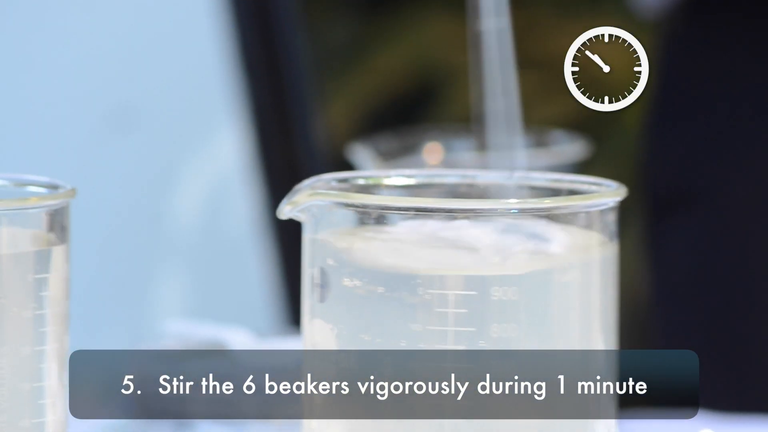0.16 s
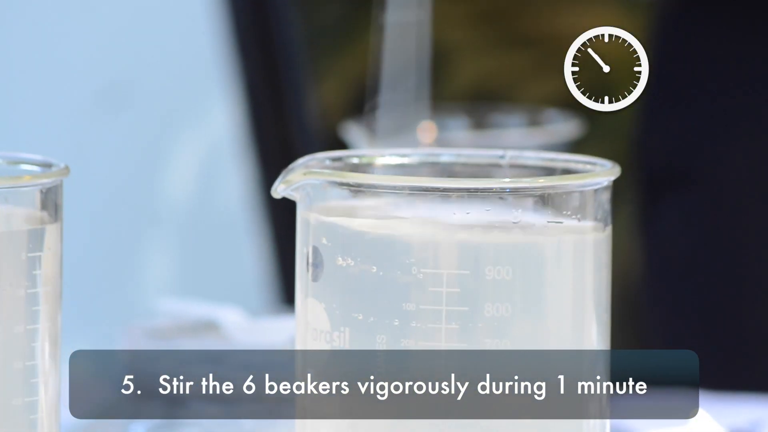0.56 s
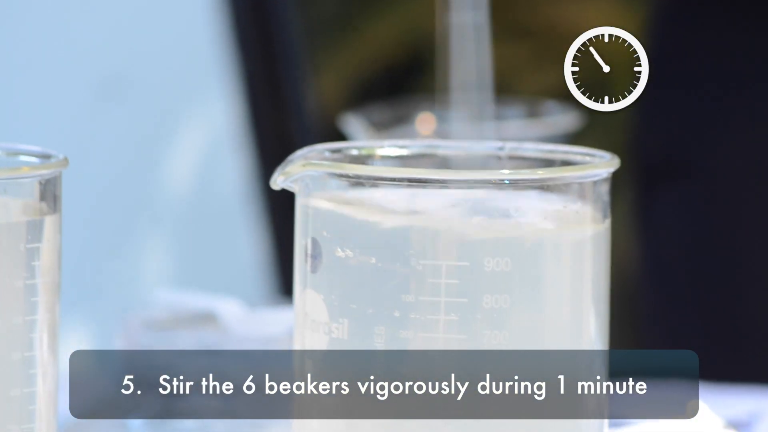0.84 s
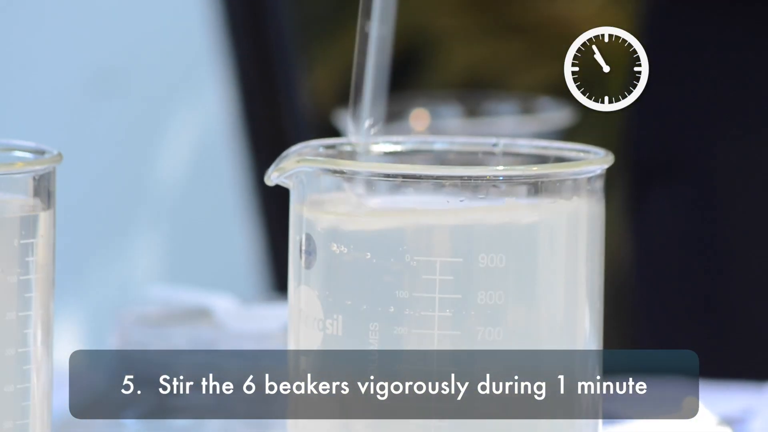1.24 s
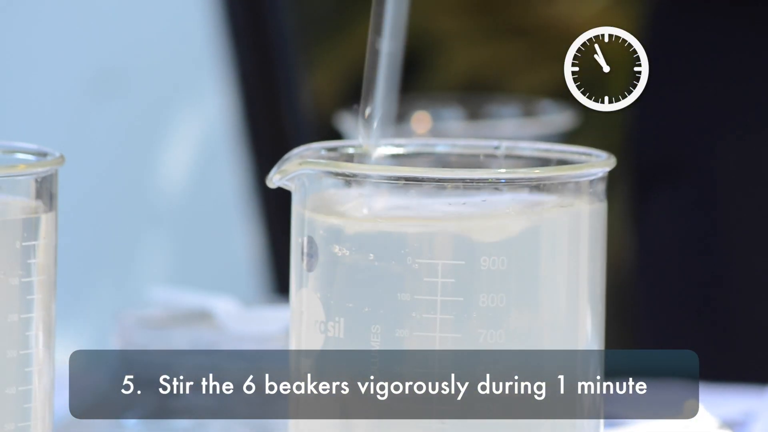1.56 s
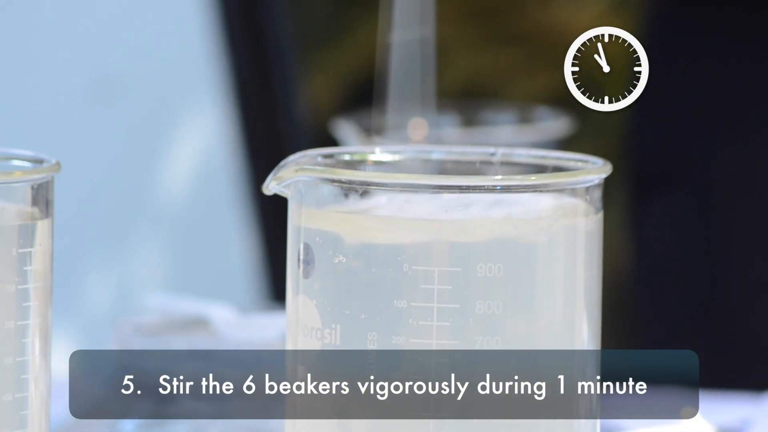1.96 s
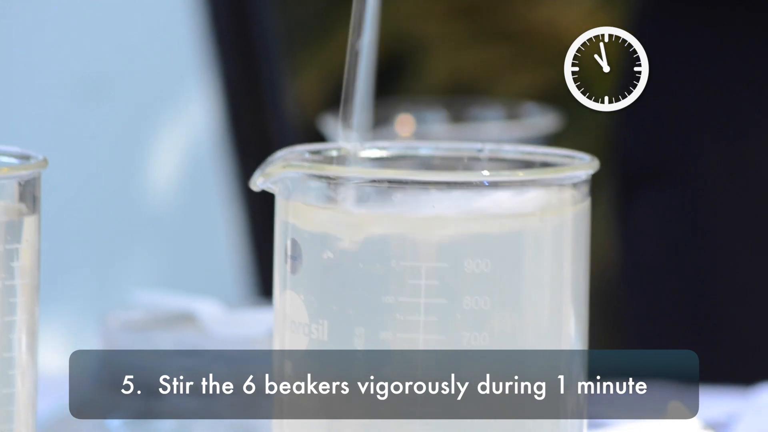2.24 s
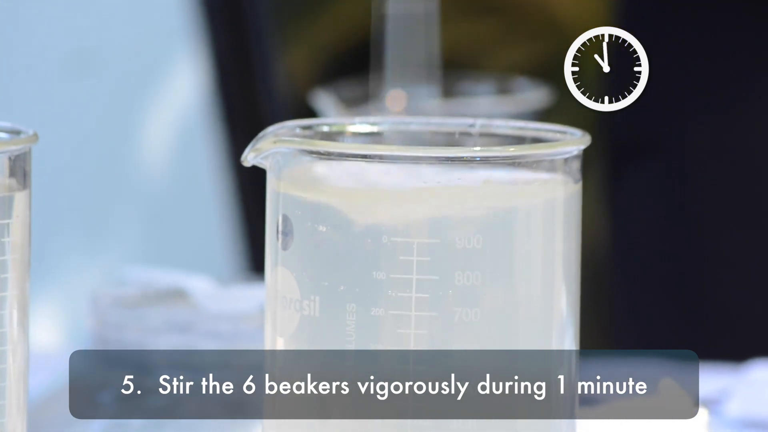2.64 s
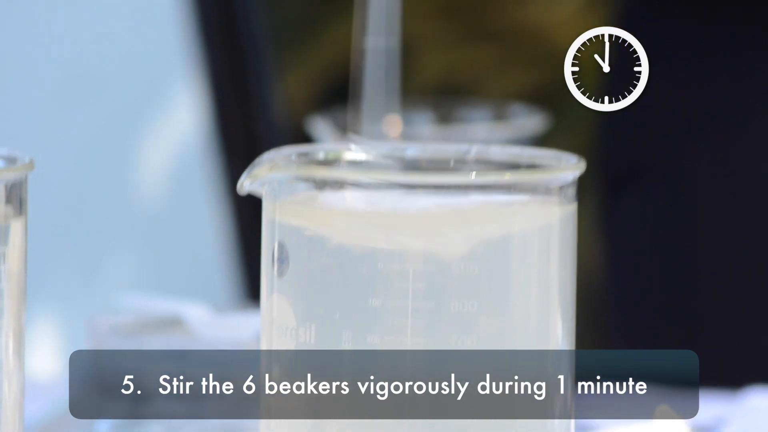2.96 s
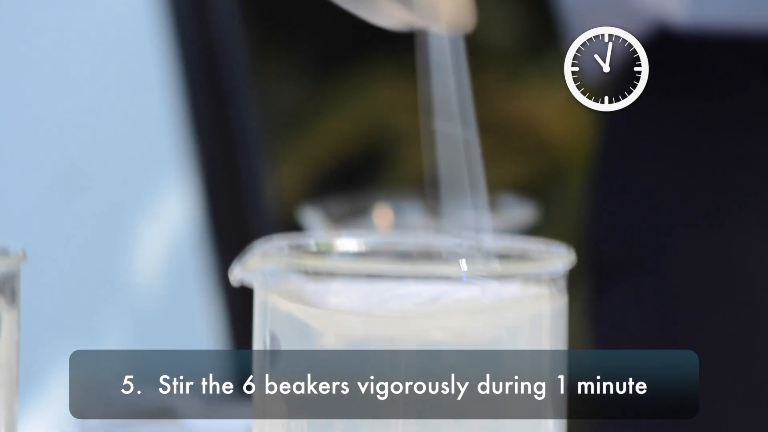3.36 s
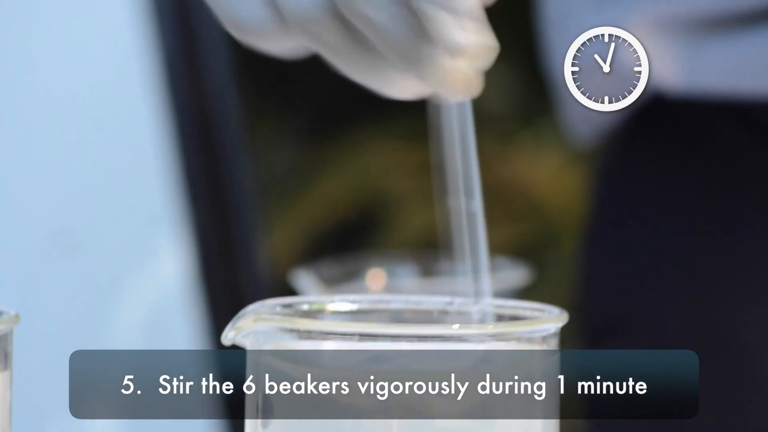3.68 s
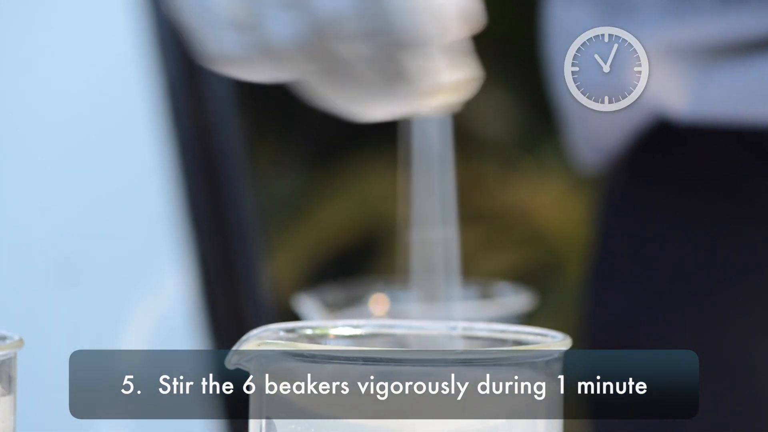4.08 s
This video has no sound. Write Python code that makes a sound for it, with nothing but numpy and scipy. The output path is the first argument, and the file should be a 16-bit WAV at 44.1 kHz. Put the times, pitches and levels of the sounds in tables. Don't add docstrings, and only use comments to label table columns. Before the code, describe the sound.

Close to the microphone, a thin glass rod knocks and bounces on the wall of a full beaker, in bright, short, wet clinks. The strokes come unevenly, with a gap early on and denser clusters after three seconds. Water hisses faintly. Behind, a songbird whistles gliding phrases softened by yard echoes, over outdoor air, distant machine hum and small puffs of wind.

```python
import sys
import numpy as np
from scipy import signal
from scipy.io import wavfile
from scipy.ndimage import uniform_filter1d

SR = 44100
rng = np.random.default_rng(int(sys.argv[2]) if len(sys.argv) > 2 else 0)


def volts_from_decibels(level):
    exponent = np.asarray(level, float) / 20
    return 10 ** exponent


def transcribe(u):
    v = np.clip(np.atleast_2d(u).T, -1, 1)
    q = np.round(v * 32767).astype(np.int16)
    wavfile.write(sys.argv[1], SR, q)


N = 185793

# t/s, level/dB, then low wall ring/dB, middle wall ring/dB, rod brightness/dB,
# all three relative to the blow
FIRST_BLOWS = [(0.0004, -10, -24, -20, -25), (0.1532, -14.5, -17, -11, -16.5), (0.323, -21, -39, -23, -23),
               (0.966, -19, -14, -14.5, -15), (1.134, -16, -8, -9.5, -13), (1.2881, -23.5, -13.5, -13, -23),
               (1.4654, -8.5, -12, -13.5, -22.5), (1.6139, -10, -27, -20.5, -12.5),
               (1.949, -9.5, -13, -12.5, -17), (2.274, -20, -48, -8.5, -17), (2.586, -21.5, -14, -8, -20),
               (2.9376, -10.5, -14.5, -4, -9), (3.265, -9, -5, -10, -10.5),
               (3.5882, -11.5, -11, -8.5, -12.5), (3.9414, -9.5, -15, -7, -14),
               (4.0956, -14.5, -16, -16, -19)]
# t/s, level/dB, middle wall ring/dB and rod brightness/dB relative to the blow
REBOUNDS = [(0.028, -18.5, -34, -15), (0.173, -16.5, -27, -21), (0.358, -21.5, -22, -15.5),
            (0.755, -54, -6, -30), (0.985, -25.5, -4.5, -19), (1.1569, -15, -17, -26),
            (1.2973, -36, -17, -22), (1.4142, -48.5, 12.5, -22), (1.4855, -20, -9.5, -15.5),
            (1.64, -13, -24, -20), (1.7604, -36, -2.5, -18), (1.9768, -17.5, -9.5, -15),
            (1.995, -27, -23, -18), (2.055, -39.5, -1, -17), (2.985, -12, -15.5, -16.5),
            (3.0207, -14.5, -11, -21), (3.047, -23, -25, -12), (3.256, -48, 0, -8),
            (3.3162, -11.5, -13.5, -14), (3.3502, -16.5, -16, -23), (3.385, -18, -12.5, -11),
            (3.6202, -13.5, -20, -15.5), (3.6446, -26, -23, -24), (3.72, -44.5, 11, -20),
            (3.9856, -17.5, -14, -12.5)]
# t/s, level/dB
DRAG = [(0.0, -60), (0.13, -53.5), (0.6, -64.5), (.95, -64), (1.25, -54.5), (1.4, -64), (1.61, -46),
        (1.75, -54), (2.32, -56.5), (2.41, -70), (2.8, -72), (3.04, -50.5), (3.16, -50), (3.22, -56),
        (3.33, -55), (3.44, -61), (3.55, -56), (3.65, -55), (3.78, -62), (4.21, -62)]


def evened(x):
    return x / np.sqrt(np.mean(x ** 2) + 1e-20)


def read(points, hz):
    f, value = np.transpose(points)
    return np.interp(np.log(hz + 1), np.log(f + 1), value)


def curve(rows):
    s, level = np.transpose(rows)
    return np.interp(np.arange(N) / SR, s, level)


def add(mix, s, sound):
    part = mix[max(round(s * SR), 0):][:len(sound)]
    part += sound[:len(part)]


def soft_rise(t, rise_s):
    return np.sin(np.pi / 2 * np.clip(t / rise_s, 0, 1)) ** 2


def bandpass(x, order, low_hz, high_hz):
    return signal.sosfilt(signal.butter(order, (low_hz, high_hz), "bandpass", fs=SR, output="sos"), x)


def spread_wide(mid, side):
    return mid + side * np.array([[1], [-1]])


def narrow(hz, width):
    r = np.exp(-np.pi * width / SR)
    z = rng.standard_normal(N) + 1j * rng.standard_normal(N)
    for _ in range(2):
        z = signal.lfilter([1 - r], [1, -r], z)
    turns = np.cumsum(hz * np.ones(N)) / SR
    return evened((z * np.exp(2j * np.pi * turns)).real)


def echoes(x, t60_low, t60_high, gap_s):
    t = np.arange(SR) / SR
    noise = rng.standard_normal((2, SR)) * np.clip(t / gap_s, 0, 1)
    low = signal.lfilter(*signal.butter(2, 5000, fs=SR), noise)
    tail = low * volts_from_decibels(-60 * t / t60_low) + (noise - low) * volts_from_decibels(-60 * t / t60_high)
    return signal.fftconvolve(x[None], tail / np.linalg.norm(tail[0]), axes=1)[:, :N]


def favoured(s):
    # t/s, f/Hz, level/dB
    by_strikes = [(0.1536, 2693, -35), (0.1536, 5140, -38), (0.1536, 8730, -36.0), (0.1536, 13900, -28),
                  (0.3228, 3400, -43), (0.3228, 4200, -43), (0.3228, 6300, -39), (0.3228, 13350, -53),
                  (0.966, 2730, -40), (0.966, 5600, -44), (0.966, 8370, -30.5), (0.966, 13600, -31),
                  (1.134, 2710, -31), (1.134, 4730, -28.5), (1.134, 7700, -27.5), (1.134, 10820, -27),
                  (1.2884, 3090, -35), (1.2884, 4810, -46), (1.2884, 8500, -41), (1.2884, 13500, -47),
                  (1.4649, 2710, -32), (1.4649, 4680, -34), (1.4649, 6270, -25.5), (1.4649, 13500, -31),
                  (1.6148, 3057, -22.5), (1.6148, 4680, -29), (1.6148, 6730, -28.5), (1.6148, 14360, -25),
                  (1.9487, 2900, -26), (1.9487, 4870, -26.5), (1.9487, 8480, -26), (1.9487, 14000, -26),
                  (2.274, 2850, -53), (2.274, 4830, -35.5), (2.274, 8290, -32.5), (2.274, 13100, -47),
                  (2.586, 3500, -34), (2.586, 4920, -36), (2.586, 8260, -38), (2.586, 13100, -43.0),
                  (2.9376, 2880, -30), (2.9376, 4630, -30.5), (2.9376, 6330, -28), (2.9376, 13710, -21),
                  (3.265, 2810, -20.5), (3.265, 4674, -27), (3.265, 7770, -27), (3.265, 14000, -19),
                  (3.5888, 3000, -26.5), (3.5888, 4910, -31.5), (3.5888, 7400, -34), (3.5888, 10800, -28.5),
                  (3.9418, 3150, -22.5), (3.9418, 4450, -41), (3.9418, 6100, -35), (3.9418, 13600, -18.5),
                  (4.0956, 2960, -37), (4.0956, 4656, -33.5), (4.0956, 7760, -28), (4.0956, 13300, -27),
                  (0.0277, 2240, -42.5), (0.0277, 6320, -41), (0.0277, 8310, -48), (0.1724, 3930, -40),
                   (0.1724, 4510, -45), (0.1724, 12770, -36), (0.3566, 3060, -43), (0.3566, 6420, -34.5),
                   (0.3566, 8520, -40), (0.9851, 2760, -36), (0.9851, 6570, -35.5), (0.9851, 8660, -35),
                   (1.1564, 3080, -29), (1.1564, 6280, -37), (1.1564, 10690, -33), (1.4855, 1930, -45),
                   (1.4855, 4610, -49), (1.4855, 13390, -31), (1.6399, 2870, -31), (1.6399, 4670, -32.5),
                   (1.6399, 13540, -30), (1.7604, 2220, -51), (1.7604, 4530, -49.5), (1.7604, 8560, -49),
                   (1.9773, 2840, -32), (1.9773, 4650, -40.5), (1.9773, 12310, -32), (2.986, 3010, -28),
                   (2.986, 4690, -34), (2.986, 7880, -23), (3.0209, 3000, -26), (3.0209, 4660, -38.5),
                   (3.0209, 8540, -30.5), (3.045, 2660, -42), (3.045, 4650, -47), (3.045, 8550, -42),
                   (3.3158, 2140, -32), (3.3158, 6300, -31), (3.3158, 7840, -24.5), (3.352, 1910, -39),
                   (3.352, 4630, -30.5), (3.352, 10790, -32.5), (3.3852, 2830, -37.5), (3.3852, 6330, -37),
                   (3.3852, 8520, -31), (3.6204, 3070, -30), (3.6204, 4670, -37), (3.6204, 13410, -28),
                   (3.9857, 2790, -26), (3.9857, 4690, -43), (3.9857, 7700, -30.5)]
    rows = [row[1:] for row in by_strikes if abs(row[0] - s) < .005]
    return np.array(rows).reshape(-1, 2)


def knock(low_db, middle_db, bright_db, singled, blow_db, rise_s):
    # f/Hz, level/dB, t60/s
    base = [(1298, -14, .12), (1600, -9, .04), (1885, 1, .09), (2050, -7, .05), (2170, -9, .04)]
    # f/Hz, level/dB, t60/s
    wall = [(2300, -14, .04), (2488, -12, .13), (2640, -11, .04), (2780, 3, .13), (2900, -10, .04),
            (3060, -3, .04), (3300, -9, .03)]
    # f/Hz, level/dB, t60/s
    upper = [(3742, -11, .08), (4150, -10, .02), (4520, -5, .035), (4645, 1, .11), (4790, -3, .03),
             (4950, -8, .02)]
    # f/Hz, level/dB, t60/s
    rod_low = [(5420, -8, .025), (5900, -9, .02), (6290, -1, .025), (6950, -5, .025), (7500, -6, .02),
               (7830, 2, .03), (8300, -5, .02), (8700, -5, .02), (9030, -8, .06), (9400, -8, .02)]
    # f/Hz, level/dB, t60/s
    rod_high = [(10300, -3, .02), (11000, -5, .02), (11720, -9, .04), (12270, -2, .025), (12600, -6, .02),
                (13390, -4, .025), (13740, 0, .025), (14300, -8, .02), (15200, -10, .02)]
    # f/Hz, t60/s
    favoured_t60 = [(2000, .05), (2800, .055), (3300, .03), (4680, .08), (6300, .04), (8000, .035),
                    (13500, .018)]

    t = np.arange(6000) / SR
    contact_s = rise_s + 0.004
    contact = 1 / (1 + (t / contact_s) ** 4.5)
    rise = soft_rise(t, rise_s)
    out = np.zeros(len(t))
    out[:600] = volts_from_decibels(-5.5) * (rise * contact)[:600] * rng.standard_normal(600)

    upper_db = (middle_db + bright_db) / 2 - 4.5
    # modes, level dB, share that rings on after contact, detuning
    families = ((base, low_db + 3.5, .55, .002), (wall, middle_db + 4.5, .5, .002),
                (upper, upper_db + 7.5, .3, .002),
                (rod_low, -5.0, .22, .009), (rod_high, bright_db + 10.5, .18, .009))
    for modes, db, rings_on, detune in families:
        hz, mode_db, t60 = np.transpose(modes)[:, :, None]
        uneven, phase = rng.standard_normal((2, len(hz), 1))
        decay_db = -60 * np.maximum(t - 0.45 * contact_s, 0) / t60
        taken = (abs(hz / (singled[:, 0] + 1) - 1) < .035).any(1, keepdims=True)
        tones = np.sin(2 * np.pi * hz * (1 + detune * phase) * t + 10 * phase)
        body = ~taken * volts_from_decibels(mode_db + 2.2 * uneven + decay_db) * tones
        rung = body.sum(0) * rise * (rings_on + (1 - rings_on) * contact)
        out += volts_from_decibels(db) * rung / np.sqrt(np.mean(rung[:300] ** 2))

    for hz, db in singled:
        rings_on = .35 if hz < 5200 else .15
        decay_db = -60 * np.maximum(t - 0.5 * contact_s, 0) / read(favoured_t60, hz)
        tone = volts_from_decibels(db + 4 - blow_db + decay_db) * np.sin(2 * np.pi * hz * t)
        out += tone * rise * (rings_on + (1 - rings_on) * contact)

    late = round(.0056 * SR)
    return out + volts_from_decibels(-12.5) * np.pad(out, (late, 0))[:len(out)]


def bubbles():
    # t/s, level/dB, f/Hz, t60/s
    pops = [(0, -15, 983, 0.024), (0, -20.5, 1270, 0.037), (0.433, -30.5, 1300, 0.032),
            (.615, -39, 926, 0.049), (0.824, -42, 1105, 0.081), (1.465, -24, 1470, .05),
            (1.461, -24.5, 1324, 0.04), (1.952, -55, 1290, 0.042), (2.587, -26, 1670, 0.028),
            (2.599, -37.5, 1046, 0.14), (2.594, -38, 960, .08), (2.59, -36, 1180, .05),
            (3.2619, -13.5, 1149, 0.056), (3.279, -26.5, 1322, 0.1), (3.264, -27, 937, 0.088),
            (3.281, -56, 195, 0.36), (3.392, -35.5, 950, 0.17), (3.389, -33, 1212, 0.054),
            (3.576, -32, 1322, 0.36), (3.587, -26.5, 1227, 0.082), (3.592, -33.5, 960, 0.053),
            (3.621, -28.5, 965, 0.04), (3.94, -7.5, 1524, 0.014), (3.983, -24.5, 1364, 0.025)]
    out, t = np.zeros(N), np.arange(9000) / SR
    for s, db, hz, t60 in pops:
        beat = 1 + .35 * np.cos(2 * np.pi * (45 * t + rng.random()))
        tone = np.sin(2 * np.pi * hz * t)
        add(out, s, volts_from_decibels(db - 60 * t / t60) * soft_rise(t, 0.0069) * beat * tone)
    return out


def rod():
    strikes = [(row, .0022) for row in FIRST_BLOWS]
    strikes += [((s, db, -22, *rest), .0036) for s, db, *rest in REBOUNDS]
    dry = np.zeros((3, N))
    for k, ((s, db, *colour), rise_s) in enumerate(sorted(strikes)):
        blow_db = db - 11.5
        struck = knock(*colour, favoured(s), blow_db, rise_s)
        add(dry[k % 3], s - .6 * rise_s, volts_from_decibels(blow_db) * struck)
    dry = bandpass(dry, 4, 1100, 15000)
    dry[0] += bubbles()
    scatter = sum(echoes(place, 0.21, 0.22, 0.002) for place in dry)
    a, b = signal.lfilter(*signal.butter(1, 8000, fs=SR), scatter)
    return spread_wide(dry.sum(0) + volts_from_decibels(-6.0) * a, volts_from_decibels(-17) * b)


def beaker_ring():
    return volts_from_decibels(curve(DRAG)) * narrow(1290, 16)


def lifted_after(strikes, lift_db, t60):
    s, db = np.transpose([row[:2] for row in strikes])[:, :, None]
    t = np.arange(N) / SR - s
    return (volts_from_decibels(db + lift_db - 60 * abs(t) / t60) * (t > 0)).sum(0)


def swirl():
    rest = volts_from_decibels(-67 + 0.065 * (curve(DRAG) + 45))
    splash = lifted_after(FIRST_BLOWS, -40, 0.62)
    spray = lifted_after(REBOUNDS + FIRST_BLOWS, -19.5, 0.098)
    return rest + splash + spray


def grazed_glass():
    # f/Hz, width/Hz, level/dB
    glass = [(4680, 300, -4), (6600, 500, -8), (8400, 600, -9)]
    return sum(volts_from_decibels(db) * narrow(hz, width) for hz, width, db in glass)


def water_hiss():
    hiss = bandpass(rng.standard_normal(N), 1, 4200, 9000)
    return swirl() * evened(evened(hiss) + grazed_glass())


def air():
    # f/Hz, level/dB
    colour = [(53, -52), (90, -17.5), (193, -17.5), (504, -5), (1150, -5), (1260, 0), (1600, -6.5),
              (2820, 3), (4180, -13.5), (4760, -16.5), (8580, -22.5), (11600, -34), (13600, -27),
              (15500, -33), (16500, -42)]
    # f/Hz, likeness (0-1)
    likeness = [(40, 0.24), (250, 0.39), (600, 0.092), (1200, 0.85), (3000, 0.53), (6000, 0.84),
                (12000, 0.15)]
    frames, hz = N // 256 + 5, np.fft.rfftfreq(1024, 1 / SR)
    a, b, c, d, patches = rng.standard_normal((frames, 513, 5)).T
    patches = uniform_filter1d(patches, size=6, axis=0)
    patches = evened(uniform_filter1d(patches, size=20, axis=1))
    same = np.clip(read(likeness, hz), -1, 1)[:, None]
    left, other = a + 1j * b, c + 1j * d
    z = np.array([left, same * left + np.sqrt(1 - same ** 2) * other])
    z *= volts_from_decibels(read(colour, hz)[:, None] + 3.7 * patches)
    return volts_from_decibels(-51) * evened(signal.istft(z, nperseg=1024, noverlap=768)[1][:, :N])


def hum():
    # f/Hz, width/Hz, level/dB above the swell
    bands = [(320, 32, 6), (499.5, 59, 9)]
    # t/s, level/dB
    swell = [(0, -75.5), (.15, -84.5), (.8, -95), (1.03, -81.5), (1.8, -76.5), (2.5, -95.5), (2.9, -84),
             (3.5, -81), (4.21, -84)]
    swell_db, out = curve(swell), 0
    for share, (hz, width, db) in zip((1, .4), bands):
        out = out + volts_from_decibels(db + share * (swell_db + 78.5) - 72.0) * narrow(hz, width)
    return out


def gusts():
    puffs = [(0, -73, 30), (.4, -64, 45), (.74, -70, 38), (1.18, -73, 60), (1.57, -68, 68),
             (1.79, -66.5, 54), (2.04, -59.5, 53), (2.45, -58.5, 99), (2.67, -67, 45), (3.35, -61, 188),
             (3.47, -49.5, 95), (3.87, -62, 175), (4.01, -61.5, 65)]
    s, db, fall = np.transpose(puffs)[:, :, None]
    t = np.arange(N) / SR - s
    calm = volts_from_decibels(-94)
    return calm + volts_from_decibels(db + np.minimum(203 * t, -abs(fall) * t)).max(0)


def wind():
    shared, left, right = rng.standard_normal((3, N))
    low = bandpass([shared + 0.95 * left, shared + 0.8 * right], 2, 30, 74)
    return gusts() * evened(low)


def whistles():
    # t/s, f/Hz, level/dB
    opening = [
        [(.03, 3500, -58), (.07, 3620, -40), (.11, 3740, -49), (.14, 3820, -47), (.19, 3950, -43),
         (.3, 4094, -50), (.49, 4147, -36.5), (.596, 4096, -45.5), (.66, 4000, -57)],
        [(.35, 2600, -56), (.39, 2857, -45), (.425, 3320, -45.5), (.44, 3377, -36), (.455, 2480, -53),
         (.475, 2260, -41.5)],
        [(.5, 2910, -38.5), (.55, 2720, -48.5), (.6, 2850, -81)],
        [(.706, 1700, -56), (.722, 2186, -46), (.735, 2330, -45), (.748, 2250, -42), (.76, 1600, -50),
         (.773, 1350, -54)],
        [(.775, 1427, -54), (.793, 1900, -49), (.815, 1995, -44), (.845, 1954, -43), (.885, 1697, -50),
         (.892, 1800, -58), (.905, 2450, -52)],
        [(.915, 2485, -47), (.95, 2200, -39), (.97, 2743, -47), (1.03, 2782, -48.5), (1.08, 2610, -73)],
        [(1.11, 2760, -76), (1.13, 2984, -41), (1.15, 3540, -35.5)],
    ]
    # t/s, f/Hz, level/dB
    middle = [
        [(1.17, 2650, -40.5), (1.21, 3015, -45.5), (1.25, 3128, -39), (1.285, 2870, -40.5), (1.32, 2032, -45),
         (1.365, 1700, -51), (1.39, 1680, -54), (1.42, 1950, -47), (1.44, 2700, -46)],
        [(1.72, 1446, -52.5), (1.8, 1676, -59), (1.85, 1597, -58), (1.9, 1600, -54), (1.92, 2030, -39.5),
         (1.96, 2200, -83), (2.03, 2100, -57)],
        [(2.045, 2145, -52), (2.08, 2705, -34.5), (2.125, 2798, -41), (2.155, 3212, -45), (2.19, 3150, -39),
         (2.23, 2767, -40), (2.28, 2456, -51)],
        [(2.3, 2406, -55), (2.32, 2484, -46), (2.345, 3314, -40.5), (2.38, 2860, -43)],
        [(2.503, 4100, -47), (2.53, 3415, -32), (2.553, 2810, -52), (2.575, 3440, -29), (2.61, 3527, -60)],
    ]
    # t/s, f/Hz, level/dB
    closing = [
        [(2.638, 1786, -55), (2.655, 1876, -50), (2.672, 1995, -37), (2.7, 2564, -41), (2.75, 2606, -42),
         (2.79, 2078, -42), (2.83, 2512, -38.5), (2.87, 2500, -68)],
        [(2.95, 2900, -54), (2.99, 3166, -48), (3.03, 2996, -37), (3.06, 2550, -44.5), (3.12, 2214, -40.5),
         (3.17, 1980, -48.5), (3.205, 1490, -55)],
        [(3.485, 3276, -38.5), (3.51, 3607, -36.5), (3.53, 3534, -36), (3.56, 2597, -38.5), (3.59, 2050, -50),
         (3.63, 2800, -40), (3.655, 3025, -38), (3.68, 2388, -45), (3.72, 2490, -46)],
        [(3.81, 2380, -37), (3.86, 2647, -45.5), (3.9, 2835, -34.5), (3.95, 2950, -52), (4.0, 2776, -46),
         (4.1, 2280, -43.5), (4.16, 2056, -45.5), (4.215, 2410, -43)],
    ]
    # t/s, length/s, from f/Hz, to f/Hz, level/dB
    chirps = [(.05, .07, 5440, 4180, -56), (2.63, .035, 5940, 5500, -58), (2.716, .06, 4810, 4040, -54),
              (4.17, .04, 5030, 3500, -59), (.065, .08, 1752, 1833, -55), (1.485, .075, 2965, 2296, -41),
              (1.582, .016, 3800, 4850, -53), (1.43, .012, 1900, 2900, -46), (2.07, .03, 1850, 2050, -50),
              (1.995, .05, 2050, 2080, -50), (3.455, .025, 2750, 3900, -47), (3.83, .09, 1480, 1500, -58),
              (4.11, .06, 1470, 1490, -55)]
    notes = opening + middle + closing
    for s, d, a, b, db in chirps:
        notes = notes + [[(s, a, db - 4), (s + d / 2, (a + b) / 2, db), (s + d, b, db - 4)]]
    out = np.zeros(N)
    for rows in notes:
        s, hz, db = np.transpose(rows)
        t = np.arange(s[0], s[-1], 1 / SR)
        glide = uniform_filter1d(np.interp(t, s, hz), size=330, mode="nearest")
        turns = np.cumsum(glide) / SR
        fade = np.clip(np.minimum(t - s[0], s[-1] - t) / 0.0011, 0, 1)
        add(out, s[0], volts_from_decibels(np.interp(t, s, db)) * np.sin(2 * np.pi * turns) * fade)
    return out


def birds():
    # delay t/s, level/dB
    slaps = [
        (.019, -6),
        (.034, -8),
        (.058, -9),
        (.085, -10),
    ]
    dry = whistles()
    flutter = uniform_filter1d(rng.standard_normal(N), size=300)
    flutter = evened(uniform_filter1d(flutter, size=300))
    dull = signal.filtfilt(*signal.butter(4, 3600, fs=SR), dry)
    near = echoes(dull, 0.42, 0.2, 0.002)
    far = echoes(dull, 1.0, 1.0, 0.027)
    thrown = np.array([volts_from_decibels(db) * np.pad(dull, (round(s * SR), 0))[:N] for s, db in slaps])
    mid = volts_from_decibels(3.8 + 1.2 * flutter) * dry + volts_from_decibels(-2.5) * thrown.sum(0)
    mid += volts_from_decibels(1.2) * near[0] + volts_from_decibels(2.2) * far[0]
    side = volts_from_decibels(-8) * (thrown[::2].sum(0) - thrown[1::2].sum(0))
    side += volts_from_decibels(-0.5) * near[1] + volts_from_decibels(-1.0) * far[1]
    return spread_wide(mid, side)


def scrapes():
    # t/s, length/s, level/dB
    slides = [
        (0.8, 0.1, -65),
        (1.417, 0.024, -75),
        (2.717, 0.028, -57),
        (2.745, 0.027, -56),
        (2.787, .08, -63.5),
        (3.726, 0.049, -64),
    ]
    s, length, db = np.transpose(slides)[:, :, None]
    t = np.arange(N) / SR - s
    level = (volts_from_decibels(db) * np.exp(-(2 * t / length) ** 2)).sum(0)
    return level * evened(grazed_glass())


def scene():
    glass = rod() + beaker_ring() + water_hiss() + scrapes()
    return glass + air() + hum() + wind() + birds()


def low_pass(x):
    return signal.sosfilt(signal.butter(12, 16690, fs=SR, output="sos"), x)


def record(dry):
    limited = signal.sosfilt(signal.cheby2(10, 50, 17000, fs=SR, output="sos"), dry)
    return low_pass(limited)


dry = scene()
out = record(dry)
transcribe(out)
```